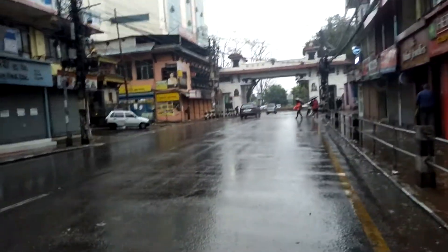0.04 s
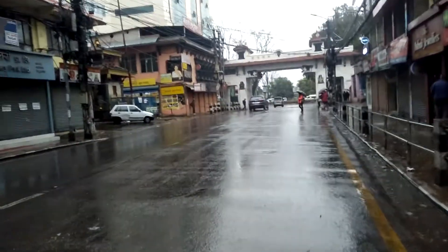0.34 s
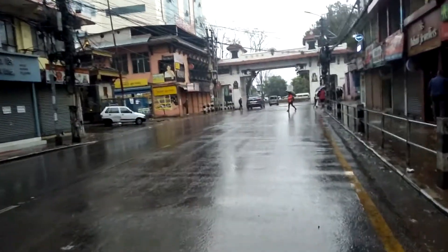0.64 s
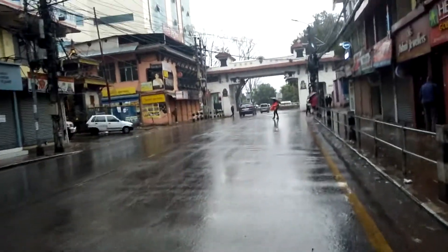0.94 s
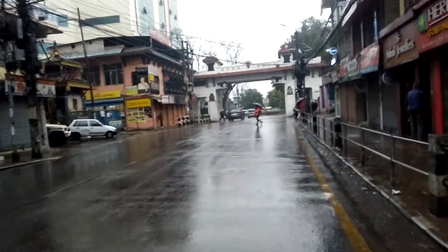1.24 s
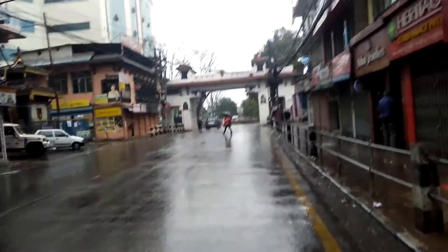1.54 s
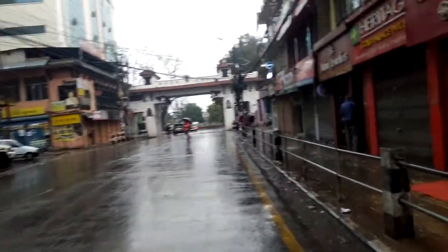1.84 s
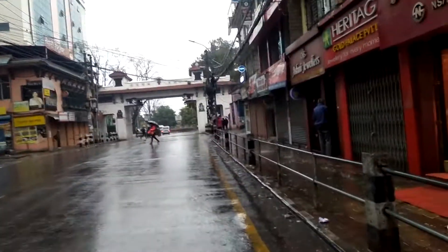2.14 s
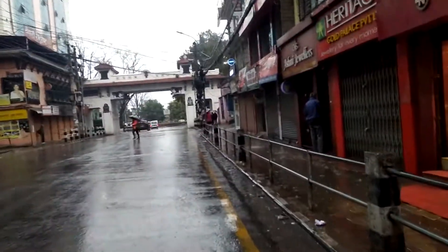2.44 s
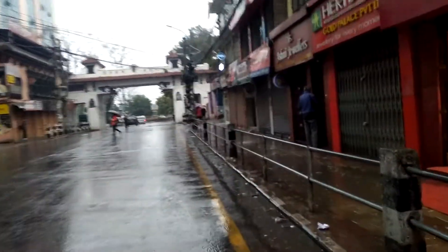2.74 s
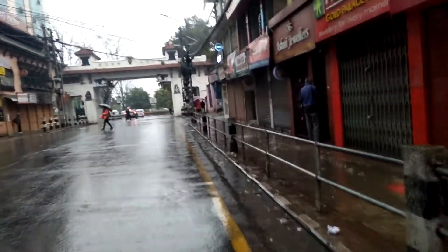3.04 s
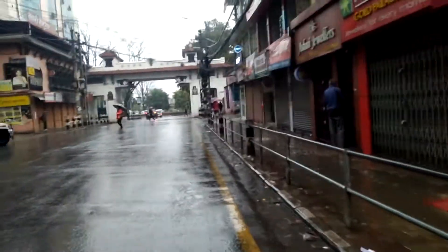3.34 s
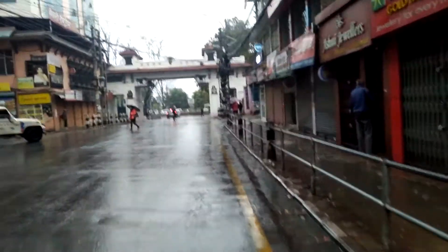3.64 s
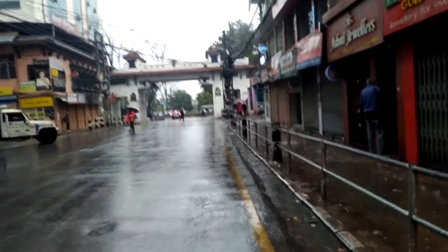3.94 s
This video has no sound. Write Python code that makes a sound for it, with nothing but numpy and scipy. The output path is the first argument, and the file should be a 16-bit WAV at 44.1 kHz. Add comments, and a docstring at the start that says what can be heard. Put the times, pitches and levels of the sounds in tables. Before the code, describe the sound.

Dense, steady rain washes over a street and patters close by, heard through a slightly muffled microphone carried by someone walking. Low step thumps and a far engine hum lie underneath, and a drop clicks sharply on the microphone late on.

```python
"""A city street in heavy rain, heard by someone walking along the kerb with a dull microphone.
Countless far drops merge into a wash, near ones slap the wet road, and some drum on something hollow.
An engine hums in the distance. Each step thumps through the hand-held recorder, and a few drops
snap on or beside its case. Thin ticks, soft spray and a faint hiss lie above the muffled street."""
import sys
import numpy as np
from scipy import signal
from scipy.fft import rfft, irfft
from scipy.io import wavfile
from scipy.ndimage import uniform_filter1d

SR = 44100
rng = np.random.default_rng(int(sys.argv[2]) if len(sys.argv) > 2 else 0)


def output_pcm(signal):
    """Save a mono or channel-first signal as 16-bit PCM at the path in sys.argv[1].

    Samples are clipped to [-1, 1] before scaling.
    """
    pcm = np.clip(np.atleast_2d(signal).T, -1, 1) * 32767
    wavfile.write(sys.argv[1], SR, np.round(pcm).astype(np.int16))


N = 176400  # 4 seconds


def gain(db):
    """Turn decibels into a number to multiply by."""
    return 10 ** (np.asarray(db) / 20)


def normalise(x):
    """Scale a sound so that its average level (rms) is 1."""
    return x / np.sqrt(np.mean(x ** 2))


def curve(rows, t, column=1):
    """Join the values in one column of a timetable with straight lines."""
    columns = np.array(rows).T
    return np.interp(t, columns[0], columns[column])


def filtered(x, hz, kind, order):
    """Keep the "low" part, the "high" part or one "band"; a higher order cuts more sharply."""
    return signal.sosfilt(signal.butter(order, hz, kind, fs=SR, output="sos"), x + 1e-18)


def wobble(per_s):
    """A smooth random wiggle, about 1 in size, with per_s new values a second."""
    hold = int(SR / per_s)
    stairs = np.repeat(rng.standard_normal(N // hold + 1), hold)
    return normalise(uniform_filter1d(uniform_filter1d(stairs, hold), hold)[:N])


def bump(age, rise_s):
    """A level that climbs to 1 at twice rise_s, then dies away."""
    return (age / rise_s / 2) ** 2 * np.exp(2 - age / rise_s)


def shaped_noise(points):
    """Noise whose tone follows a list of (pitch_hz, level_db) points."""
    hz, db = np.array(points).T
    freqs = np.maximum(np.fft.rfftfreq(N, 1 / SR), 1)
    shape = gain(np.interp(np.log(freqs), np.log(hz), db))
    return normalise(irfft(rfft(rng.standard_normal(N)) * shape, N))


def band_noise(hz, width_hz, order=2):
    """Noise around one pitch; the narrower it is, the more it sounds like a note."""
    edges_hz = [hz - width_hz / 2, hz + width_hz / 2]
    return normalise(filtered(rng.standard_normal(N), edges_hz, "band", order))


def fizz(hz, width_hz, crackle_db=4.5):
    """Noise whose level jumps about so fast that it crackles."""
    return normalise(band_noise(hz, width_hz) * gain(crackle_db * wobble(700)))


def random_hits(per_s, spread_db, max_db):
    """Single clicks at random moments, many small and few large."""
    when, chance = rng.random((int(per_s * N / SR), 2)).T
    size_db = np.minimum(-spread_db * np.log(1 - chance), max_db)
    hits = np.zeros(N)
    np.add.at(hits, (when * N).astype(int), gain(size_db))
    return hits


# The tone of the hiss: pitch_hz, relative_db
HISS_TONE = [(6000, -3), (9000, -3.5), (12000, -1.5), (15500, -4.5)]

def hiss(level_db=-69.5):
    """A faint, steady hiss."""
    return gain(level_db) * shaped_noise(HISS_TONE)


# How loud the sizzle is: time_s, level_db
SIZZLE_LEVELS = [(0, -83), (3.0, -82), (3.45, -73), (3.6, -60), (3.7, -69), (3.87, -73), (3.97, -63)]

def sizzle(t):
    """A fine, very high sizzle that flares up near the end."""
    return gain(curve(SIZZLE_LEVELS, t)) * fizz(hz=12700, width_hz=2700)


# The engine's hum over time: time_s, pitch_hz, level_db
ENGINE_HUM = [(0, 77, -39), (.55, 77.5, -50), (.8, 77.7, -39), (1.25, 78, -30), (1.45, 78, -31),
              (1.55, 77.5, -37), (1.8, 77, -33), (2.15, 76, -38), (2.32, 75.3, -26), (2.45, 75.5, -45),
              (3.0, 76, -43), (3.15, 76.5, -30.5), (3.3, 77, -44), (3.8, 78, -38), (3.96, 78.5, -27)]
# The tones in that hum: multiple_of_pitch, relative_db
ENGINE_TONES = [(1, -6), (2, -0.6), (3, -14)]

def engine(t, drift=.006, waver_db=1.6):
    """A far engine: only the lowest tones of its firing arrive, as a hum that comes and goes."""
    pitch_hz = curve(ENGINE_HUM, t) * (1 + drift * wobble(10))
    phase = 2 * np.pi * np.cumsum(pitch_hz) / SR
    hum = 0
    for multiple, db in ENGINE_TONES:
        tone = np.sin(multiple * phase) * gain(waver_db * wobble(6.2))
        hum += gain(db) * normalise(tone)
    return gain(curve(ENGINE_HUM, t, column=2)) * hum


# Brief swells, and a faint overtone of the hollow thing's ring near 3.84 s: peak_time_s, fade_s, pitch_hz,
# width_hz, level_db
BRIEF_SWELLS = [(2.92, .065, 560, 90, -27), (3.84, .08, 2610, 60, -35)]

def brief_swells(t):
    """Noise that is almost a note fades in and straight out again."""
    return sum(gain(db) * band_noise(hz, width_hz) * np.exp(-((t - peak_s) / fade_s) ** 2)
               for peak_s, fade_s, hz, width_hz, db in BRIEF_SWELLS)


# The note of the hollow thing: time_s, pitch_hz, level_db
HOLLOW_NOTE = [(0, 1316, -33), (1.3, 1329, -34.5), (1.8, 1343, -41), (3.2, 1370, -41.5), (3.8, 1406, -32.5),
               (4, 1402, -36)]

def hollow_ring(t, width_hz=100):
    """Rain drums on something hollow, which rings faintly; the note drifts slowly upward."""
    phase = 2 * np.pi * np.cumsum(curve(HOLLOW_NOTE, t)) / SR
    flutter = filtered(rng.standard_normal((2, N)), width_hz / 2, "low", order=2)
    ring = normalise(flutter[0] * np.cos(phase) + flutter[1] * np.sin(phase))
    return gain(curve(HOLLOW_NOTE, t, column=2)) * ring


# The pitches of the spray: pitch_hz
SPRAY_PITCHES = [7400, 10000, 12300, 14000]

def spray(per_s=14, level_db=-78):
    """Tiny splashes at random moments, each a soft puff of high fizz."""
    puff = bump(np.arange(N // 32) / SR, rise_s=.0053)
    out = 0
    for hz in SPRAY_PITCHES:
        hits = random_hits(per_s / len(SPRAY_PITCHES), spread_db=3.5, max_db=10)
        out += fizz(hz, width_hz=1600) * signal.oaconvolve(hits, puff)[:N]
    return gain(level_db) * normalise(out)


# Thin ticks close to the microphone: start_s, level_db, pitch_hz, width_hz
THIN_TICKS = [(.398, -50.5, 10150, 1700), (.621, -58, 7450, 2500), (.66, -49, 7460, 700),
              (.662, -56, 10600, 1000), (1.247, -47.5, 14000, 2600), (1.652, -53, 12400, 2200),
              (2.07, -51, 12300, 3000), (2.56, -56, 11400, 3600), (2.829, -58.5, 11100, 2000),
              (3.296, -47, 9700, 4000), (3.323, -47.5, 12600, 5000), (3.531, -40.5, 12100, 3400),
              (3.765, -52, 12800, 3400), (3.95, -57, 12600, 2000)]

def ticks(t, rise_s=.004, fade_s=.0041, tail_s=.037, tail_db=-8, ring_db=-7.5):
    """Tiny bright ticks, each trailing off in fizz and a faint ring."""
    out = 0
    for start_s, db, hz, width_hz in THIN_TICKS:
        age = np.maximum(t - start_s, 0)
        rise = np.minimum(age / rise_s, 1)
        fall = np.exp(-age / fade_s) + gain(tail_db) * np.exp(-age / tail_s)
        body = fizz(hz, width_hz) + gain(ring_db) * band_noise(hz, width_hz=400)
        out += gain(db) * body * rise * fall
    return out


# The walker's steps: start_s, level_db, pitch_hz
FOOTSTEPS = [(.513, -15.5, 77.4), (.988, -18.5, 71.6), (1.75, -19, 81), (2.214, -18.5, 76),
             (2.675, -18.5, 80), (2.995, -17.5, 77.4), (3.45, -16.5, 78), (3.55, -20.5, 105)]

def footsteps(t, rise_s=.0135, sag_per_s=1.2, trim_db=-1.3):
    """Each step sends a soft thump, sagging in pitch, through the hand-held recorder."""
    out = 0
    for start_s, db, hz in FOOTSTEPS:
        age = np.maximum(t - start_s, 0)
        pitch_hz = hz * np.exp(-sag_per_s * (age - 2 * rise_s))
        phase = 2 * np.pi * np.cumsum(pitch_hz * (age > 0)) / SR
        out += gain(db + trim_db) * bump(age, rise_s) * np.sin(phase)
    return out


# Drops on or beside the recorder's case, and plinks into puddles near 1.80 s and 1.91 s: time_s, level_db,
# pitch_hz, snap_s
SNAPPING_DROPS = [(1.7955, -14, 2870, .0007), (1.9105, -15, 2770, .0006), (1.933, -18, 3500, .0004),
                  (3.163, -20, 4500, .0003), (3.2965, -18, 3700, .0005), (3.325, -16, 4600, .00022),
                  (3.5325, -2, 3550, .00018), (3.539, -15, 3900, .00025)]

def snapping_drops(t, splash_s=.008, splash_db=-25):
    """A drop snaps for a few vibrations and leaves a short splash, whether at the recorder's case or as a plink
    into a puddle."""
    out = 0
    for time_s, db, hz, snap_s in SNAPPING_DROPS:
        age = t - time_s
        snap = np.exp(-(age / snap_s) ** 2 / 2) * np.cos(2 * np.pi * hz * age)
        fade = (age > 0) * np.exp(-abs(age) / splash_s)
        splash = gain(splash_db) * band_noise(hz, width_hz=3000, order=4) * fade
        out += gain(db) * (snap + splash)
    return out


# The tone of the far rain and the street: pitch_hz, relative_db
WASH_TONE = [(25, -15.5), (50, -4.5), (75, -4.5), (110, -2.5), (160, -2.5), (220, -3), (290, -5.5),
             (370, -8.5), (520, -8), (720, -7), (980, -11), (1350, -9), (1900, -11.5), (2800, -14),
             (3500, -18), (4300, -25), (5300, -32), (5900, -38.5), (7500, -66.5)]
# How the street's low rumble rises and falls: time_s, change_db
STREET_RUMBLE = [(0, -1.5), (.4, -2.5), (.9, 1.9), (1.6, 0.5), (2.1, 0), (2.6, -1), (3.05, 3.5), (3.5, 1),
                 (4, -1)]

def rain_wash(t, swell_db=.3, flicker_db=.9):
    """Far drops and street rumble blur into noise; its octaves swell together and flicker alone."""
    spectrum = rfft(shaped_noise(WASH_TONE))
    swell = swell_db * wobble(3.6)
    freqs = np.maximum(np.fft.rfftfreq(N, 1 / SR), 1)
    octave = np.clip(np.log2(freqs / 40), 0, 7)  # counted up from 40 Hz
    out = 0
    for k in range(8):
        band = irfft(spectrum * np.maximum(1 - abs(octave - k), 0), N)
        rumble_db = curve(STREET_RUMBLE, t) if k <= 2 else 0
        out += band * gain(swell + flicker_db * wobble(24.8) + rumble_db)
    return normalise(filtered(out, 22, "high", order=2))


def fine_drops():
    """Small drops close by make a light, bright crackle."""
    hits = random_hits(per_s=170, spread_db=5, max_db=10)
    crackle = filtered(hits, [1470, 3480], "band", order=2)
    return normalise(filtered(crackle, 4470, "low", order=10))


def splat(hits, width_s, low_cut_hz, order):
    """Turn each click into a drop on wet ground: one short pulse of air with a rebound."""
    lead = 32  # samples before the middle of the pulse
    age = np.arange(-lead, 224) / SR
    pulse = filtered(np.exp(-(age / width_s) ** 2 / 2), low_cut_hz, "high", order)
    return -signal.oaconvolve(hits, pulse / pulse.max())[lead:lead + N]


def patter():
    """Hundreds of near drops hit the wet road every second."""
    hits = random_hits(per_s=600, spread_db=2.5, max_db=11)
    return normalise(splat(hits, width_s=.000095, low_cut_hz=306, order=1))


# The heaviest drops: time_s, level_db, width_s
HEAVY_DROPS = [(.034, -7.5, .0001), (.0589, -9, .00008), (.1021, -7.5, .0001), (.1031, -9, .00012),
               (.2151, -9, .0001), (.3161, -9, .0001), (.5084, -6.5, .0001), (.589, -8.5, .0001),
               (.6077, -9.5, .0001), (.6554, -6.5, .00008), (.7183, -8.5, .00009), (.7517, -11, .00011),
               (.7528, -4.5, .00011), (1.2176, -7, .00011), (1.4411, -8, .0001), (1.475, -4.3, .00016),
               (1.6684, -9, .0001), (1.8495, -9, .0001), (2.3083, -8, .0001), (2.3779, -8, .00011),
               (2.4376, -8, .0001), (2.6215, -8, .0001), (2.63, -7, .0001), (2.9026, -8, .0001),
               (2.9808, -9, .0001), (3.1236, -8.5, .0001), (3.9327, -9, .00015)]

def heavy_drops(droplets=4, scatter_s=.0027, droplet_db=-10.5):
    """Each heavy drop slaps the road close by and throws off droplets that land just after it."""
    out = 0
    for time_s, db, width_s in HEAVY_DROPS:
        landings_s = time_s + scatter_s * rng.exponential(size=droplets)
        hits = np.zeros(N)
        hits[int(time_s * SR)] = gain(db)
        np.add.at(hits, (landings_s * SR).astype(int) % N, gain(db + droplet_db))
        out += splat(hits, width_s, low_cut_hz=160, order=2)
    return out


# How hard it rains, for the wash, patter and fine drops: time_s, level_db
RAIN_STRENGTH = [(0, -23.5), (.7, -23), (1.3, -23), (1.45, -22.5), (1.7, -22), (3.0, -21.5), (3.45, -22),
                 (3.8, -21), (4, -21)]

def scene():
    """Mix the muffled street and the close sounds, with the thin, high ones on top."""
    t = np.arange(N) / SR
    strength = gain(curve(RAIN_STRENGTH, t))
    far = strength * gain(.15) * rain_wash(t) + hollow_ring(t) + engine(t) + brief_swells(t)
    far = filtered(far, 5980, "low", order=20)  # the dull microphone
    near = strength * (gain(-5.5) * patter() + gain(-13.5) * fine_drops())
    close = footsteps(t) + filtered(heavy_drops() + snapping_drops(t), 6200, "low", order=6)
    high = ticks(t) + spray() + sizzle(t) + hiss()
    return (far + near + close + high)[None]


def record(dry):
    """The recorder cuts off the very highest sounds."""
    top_hz = 15800
    return signal.sosfilt(signal.ellip(8, .2, 70, top_hz, fs=SR, output="sos"), dry)


dry = scene()
out = record(dry)
output_pcm(out)
```